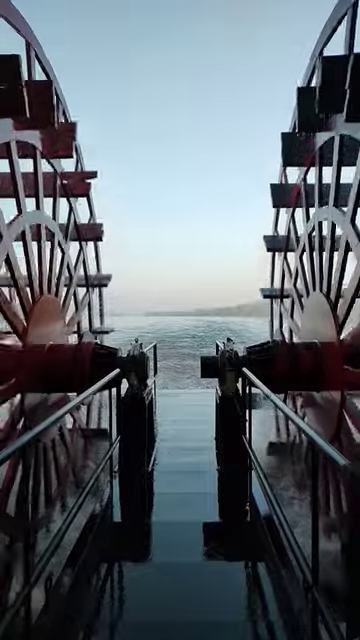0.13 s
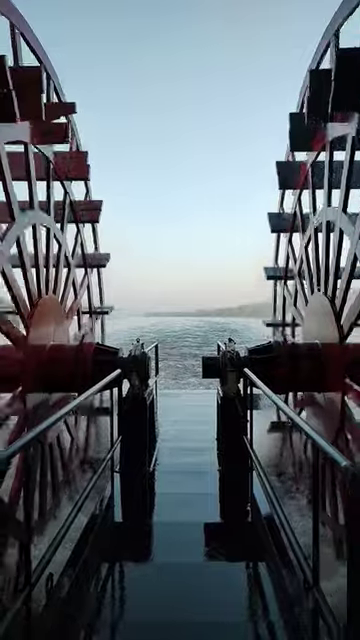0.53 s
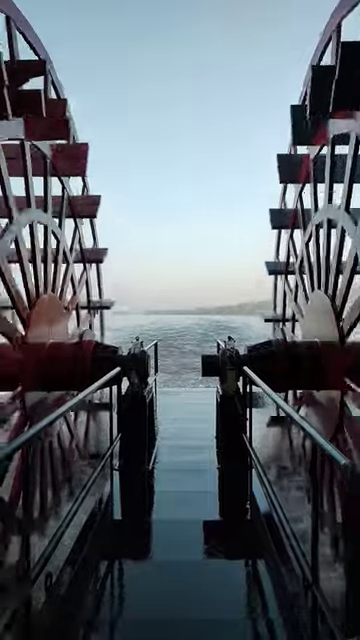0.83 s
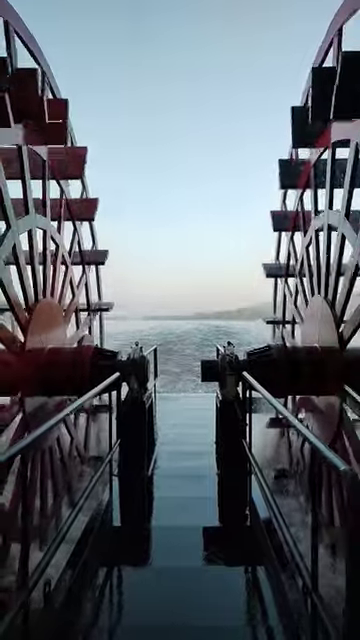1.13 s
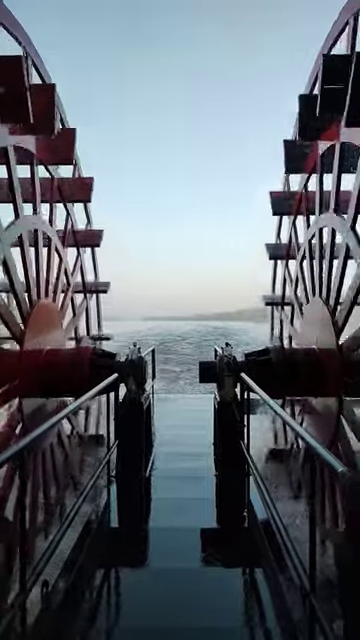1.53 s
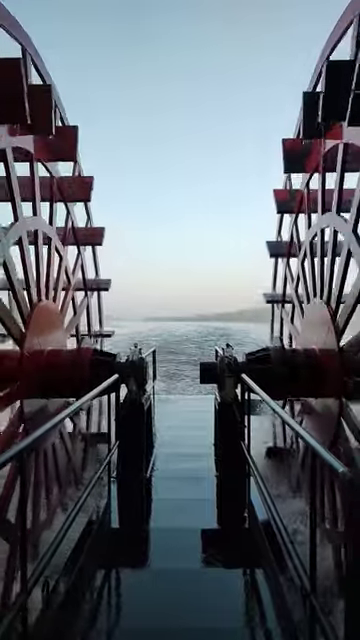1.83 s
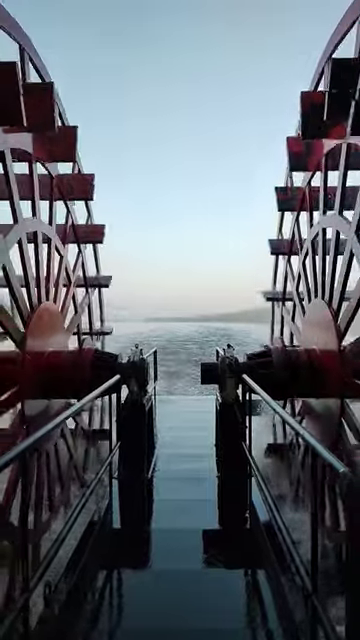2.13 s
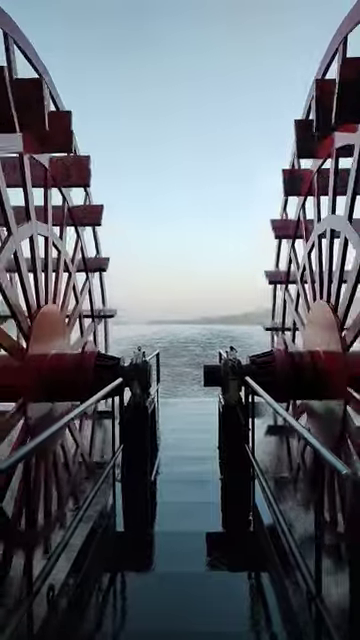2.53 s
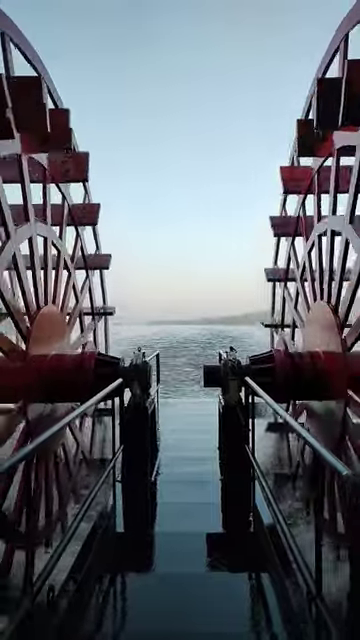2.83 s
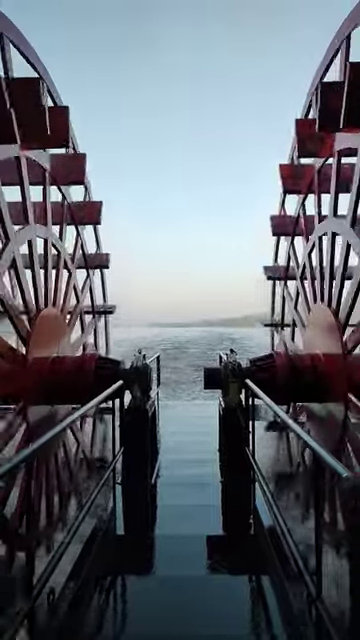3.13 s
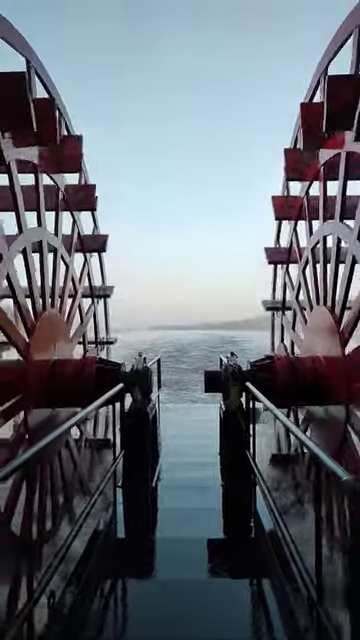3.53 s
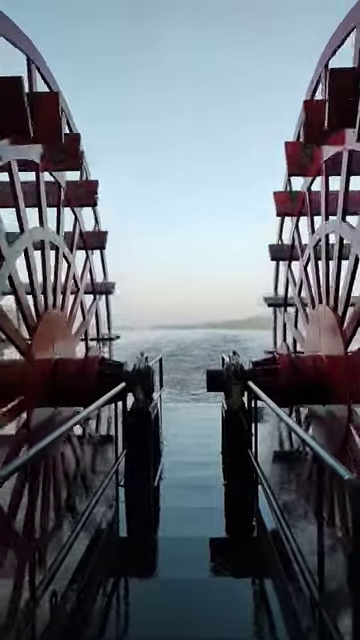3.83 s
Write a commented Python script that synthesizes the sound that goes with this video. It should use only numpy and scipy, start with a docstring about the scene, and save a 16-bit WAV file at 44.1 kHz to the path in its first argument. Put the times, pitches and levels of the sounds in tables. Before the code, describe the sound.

After a brief silence, a loud, sharp steam-like hiss cuts in on a paddle boat's stern deck, sputtering and surging over churned water and engine rumble; later its colour shifts and the wash comes forward. Close, mono.

```python
"""Paddle boat stern deck

Under way, in mono; the sound cuts in after a short silence. A loud, surging hiss, probably steam, is noise
in two bands. The wheels' wash is patchy noise with bubble rings; the engine room is low noise with growing
deep bass; hum and whine are sines of unsteady pitch.
Partway the listening position shifts: the hiss changes colour, and wash and drone come forward."""
import sys
import numpy as np
from scipy import signal
from scipy.fft import rfft, irfft, next_fast_len
from scipy.io import wavfile
from scipy.ndimage import uniform_filter1d, map_coordinates

SR = 44100
rng = np.random.default_rng(int(sys.argv[2]) if len(sys.argv) > 2 else 0)


def digitize_waveform(pressure):
    """Quantize a signal to 16-bit integers and store it at the path in sys.argv[1].

    Rows of a 2-D input are taken as channels; values are limited to [-1, 1].
    """
    field = np.atleast_2d(pressure).T
    bounded = np.clip(field, -1, 1)
    quanta = np.round(bounded * 32767).astype(np.int16)
    wavfile.write(sys.argv[1], SR, quanta)


N = 176400

# Bright hiss level before HISS_TRIM_DB: start_s, level_db
BRIGHT_HISS_LEVEL = [(.31, -11.5), (.35, -13), (.43, -16.5), (.47, -12.5), (.63, -13), (.72, -12.7),
                     (.88, -13), (.95, -16), (1.06, -13.5), (1.16, -13.5), (1.25, -11.5), (1.35, -16),
                     (1.39, -11.5), (1.52, -14.5), (1.63, -14), (1.71, -11.5), (1.78, -12), (1.87, -14.5),
                     (1.98, -11.5), (2.04, -12.5), (2.13, -13), (2.19, -15.5), (2.29, -13), (2.4, -14.5),
                     (2.5, -12), (2.58, -14.5), (2.68, -13.3), (2.91, -14), (3.15, -13), (3.21, -14),
                     (3.45, -14.6), (3.52, -12.5), (3.6, -13.8), (3.72, -12), (3.8, -15.5), (3.92, -12.5)]
# Lower hiss level: start_s, level_db
LOW_HISS_LEVEL = [(.32, -19.5), (.43, -23), (.48, -20), (.8, -19.5), (.95, -20.5), (1.06, -20),
                  (1.35, -20.5), (1.45, -19.3), (1.54, -22.5), (1.63, -19), (1.75, -19), (1.86, -22.5),
                  (1.93, -19.5), (2.12, -20), (2.19, -23), (2.29, -19), (2.35, -21.5), (2.78, -21.5),
                  (3.15, -21), (3.22, -23), (3.72, -20.5), (3.8, -23.5), (4, -21.5)]
# Hiss spectrum before the shift: frequency_hz, relative_db
HISS_SPECTRUM_BEFORE = [(1500, -25), (2400, -21.5), (2850, -18), (3150, -11), (3400, -8.5), (3800, -14.5),
                        (4400, -9), (5200, -10), (5650, -8.5), (6000, -8.5), (6850, -1), (7250, -1.5),
                        (7800, 1.5), (8250, -3), (9000, -10), (10000, -16.5), (11500, -25), (15300, -25.5)]
# Hiss spectrum after the shift: frequency_hz, relative_db
HISS_SPECTRUM_AFTER = [(1500, -43), (2400, -19.5), (2900, -16), (3400, -11.5), (3850, -16.5), (4500, -9.5),
                       (4850, -10.5), (5350, -12.5), (5700, -7.5), (6000, -11.5), (6400, -3.5),
                       (6900, -2.5), (7250, -3), (7800, 0), (8400, -3), (9000, -7.5), (10000, -14),
                       (11500, -22.5), (15300, -24)]
# Churned water spectrum: frequency_hz, relative_db
WASH_SPECTRUM = [(200, -26), (450, -3), (560, -4.5), (750, -1.5), (1050, -0.5), (1450, -1.5), (1800, 1.5),
                 (1950, 3), (2080, -4.5), (2300, -9), (3200, -20), (6000, -40)]
# Wash level before WASH_TRIM_DB: start_s, level_db
WASH_LEVELS = [(0.32, -25.5), (0.84, -25.5), (0.95, -28), (1.2, -24), (1.21, -26.5), (1.76, -25.5),
               (1.88, -28.5), (1.9, -24.5), (2.18, -27.5), (2.72, -23), (2.89, -26.5), (2.95, -23.5),
               (3.87, -23.5), (4.0, -21)]
# Engine room spectrum: frequency_hz, relative_db
RUMBLE_SPECTRUM = [(20, -38), (36, -26), (50, -11.5), (65, -5.5), (76, -4.5), (92, 2), (108, -1.5),
                   (135, 0), (175, -3), (197, 2), (218, -2.5), (330, -1.5), (405, -2), (470, -8.5),
                   (560, -18.5), (900, -32.5)]
# Rumble level before RUMBLE_TRIM_DB: start_s, level_db
RUMBLE_LEVELS = [(0.32, -22.5), (0.42, -27), (0.58, -23.5), (1.0, -25.5), (1.05, -23.5), (2.39, -24),
                 (2.51, -19), (2.54, -25), (2.9, -21.5), (4.0, -21)]
# Gain on the deepest part of the rumble: start_s, gain_db
DEEP_BASS_GAIN = [(.31, -20), (.5, -8), (.7, -3), (2.3, 1), (2.8, 2), (4, 3)]
# Steady machinery tones: pitch_hz, before_shift_db, after_shift_db, wander_hz
MACHINE_TONES = [(120, -33.5, -29.5, 1.6), (339, -37, -34, 3.5), (748, -43, -50, 3), (3366, -45, -50, 8),
                 (3972, -44, -50, 2), (4288, -40, -45, 2), (4372, -36.5, -38, 1.5), (4456, -44, -36.5, 2),
                 (6855, -31, -39, 14)]
# Swelling hum: start_s, level_db
HUM_LEVELS = [(.31, -45), (.55, -29.5), (.9, -42), (1.5, -38), (2, -34.5), (2.3, -29.5), (2.6, -28.5),
              (2.8, -40), (3.2, -30), (3.6, -30.5), (4, -41)]
# Whine, perhaps a pump: start_s, level_db
WHINE_LEVELS = [(.31, -38), (.5, -26), (.62, -42), (1.1, -39), (1.25, -44), (1.38, -27), (1.55, -45),
                (2.3, -39), (2.7, -31), (3, -29), (3.3, -35), (3.53, -27.5), (3.8, -33), (4, -35)]
# Whine partials: pitch_hz, relative_db, wander_hz
WHINE_PARTIALS = [(1936, 0, 6), (1890, -3.5, 7)]

START_S, FADE_IN_S = 0.3081, 0.002
SHIFT_MIDDLE_S, SHIFT_LENGTH_S = 2.58, 0.68
HISS_SPLIT_HZ, DEEP_BASS_HZ = 6120, 91
HISS_TRIM_DB, WASH_TRIM_DB, RUMBLE_TRIM_DB = -1, 1, -0.58
BUBBLES_PER_S, BUBBLE_MEDIAN_HZ, BUBBLE_DECAY_CYCLES, BUBBLE_DB = 350, 1000, 7.5, -10
TONE_WAVER_DB, WAVER_KNOTS_PER_S, WANDER_KNOTS_PER_S = 1.5, 7.07, 25
HUM_HZ, HUM_WANDER_HZ = 160.5, 1.24
CEILING, TOP_HZ = 0.97, 15550


def amp(db):
    """Decibels to gain."""
    return 10 ** (np.asarray(db) / 20)


def unit(x):
    """x at rms 1."""
    return x / np.sqrt(np.mean(x ** 2) + 1e-20)


def curve(rows):
    """(s, value) rows as one value per sample."""
    return np.interp(np.arange(N) / SR, *np.transpose(rows))


def wobble(knots_per_s):
    """Smooth random curve through normal-distributed knots."""
    knots = rng.standard_normal(2048)
    return map_coordinates(knots, [np.arange(N) * knots_per_s / SR], mode="mirror")


def wandering_sine(pitch_hz, wander_hz, knots_per_s):
    """Sine of unsteady pitch: the phase integrates the wandering frequency."""
    frequency_hz = pitch_hz + wander_hz * wobble(knots_per_s)
    return np.sin(2 * np.pi * np.cumsum(frequency_hz) / SR)


def filtered(x, response):
    """x times a zero-phase response of frequency."""
    padded = next_fast_len(N + SR // 2)
    spectrum = rfft(x, padded) * response(np.fft.rfftfreq(padded, 1 / SR))
    return irfft(spectrum, padded)[:N]


def coloured(x, spectrum):
    """x shaped by (Hz, dB) points on a log axis, at rms 1."""
    point_hz, point_db = np.transpose(spectrum)
    log_hz = np.log(point_hz + 1)
    return unit(filtered(x, lambda hz: amp(np.interp(np.log(hz + 1), log_hz, point_db))))


def rush(spectrum, patchy_db):
    """Coloured noise, rms 1, with random gain patches in time and frequency."""
    noise = signal.stft(rng.standard_normal(N), nperseg=512)[2]
    patches = uniform_filter1d(rng.standard_normal(noise.shape), size=7, axis=0)
    patches = uniform_filter1d(patches, size=10, axis=1)
    patchy = signal.istft(noise * amp(patchy_db * unit(patches)), nperseg=512)[1][:N]
    return coloured(patchy, spectrum)


def shift():
    """Listening position: 0 before the move, 1 after."""
    return np.clip((np.arange(N) / SR - SHIFT_MIDDLE_S) / SHIFT_LENGTH_S + 0.5, 0, 1)


def steam():
    """Jet noise that sputters finely; its lower and bright bands surge separately."""
    moved = shift()
    # equal-power crossfade
    jet = np.sqrt(1 - moved) * rush(HISS_SPECTRUM_BEFORE, patchy_db=0.76)
    jet += np.sqrt(moved) * rush(HISS_SPECTRUM_AFTER, patchy_db=0.7)
    low = filtered(jet, lambda hz: 1 / (1 + (hz / HISS_SPLIT_HZ) ** 12))
    bright = jet - low
    sputter = unit(amp(0.32 * wobble(25.12) + 0.4 * wobble(260)))
    bright_surge = amp(HISS_TRIM_DB + curve(BRIGHT_HISS_LEVEL)) * unit(bright)
    low_surge = amp(curve(LOW_HISS_LEVEL)) * unit(low)
    return sputter * (bright_surge + low_surge)


def wash():
    """The paddles churn the river: a rush with bubbles in it."""
    water = rush(WASH_SPECTRUM, patchy_db=0.8)
    water += amp(BUBBLE_DB) * coloured(bubbles(), WASH_SPECTRUM)
    return amp(WASH_TRIM_DB + curve(WASH_LEVELS) + 0.52 * wobble(14)) * water


def bubbles(count=2000):
    """Air beaten into the water: short decaying rings of rising pitch, at random times."""
    t = np.arange(SR // 30) / SR
    start_s = np.cumsum(rng.exponential(size=count)) / BUBBLES_PER_S
    pitch_hz = BUBBLE_MEDIAN_HZ * np.exp(0.449 * rng.standard_normal((count, 1)))
    size = amp(2.8 * np.minimum(rng.exponential(size=(count, 1)), 4))
    age = pitch_hz * t / BUBBLE_DECAY_CYCLES
    phase = 2 * np.pi * pitch_hz * t * (1 + 0.04 * np.minimum(age, 2))
    envelope = np.exp(-2 * age) * (1 - np.exp(-20 * age))
    rings = size * np.sin(phase) * envelope
    at = (start_s[:, None] * SR).astype(int) + np.arange(len(t))
    return np.bincount(at.ravel(), rings.ravel(), N)[:N]


def rumble():
    """Engine room roar through the deck: low noise whose deepest part grows."""
    roar = rush(RUMBLE_SPECTRUM, patchy_db=0.84)
    deep = filtered(roar, lambda hz: 1 / (1 + (hz / DEEP_BASS_HZ) ** 6))
    balanced = roar - deep + amp(curve(DEEP_BASS_GAIN)) * deep
    return amp(RUMBLE_TRIM_DB + curve(RUMBLE_LEVELS)) * balanced


def tones():
    """Motors and pumps: sines, each a little unsteady in pitch and level."""
    out, moved = np.zeros(N), shift()
    for pitch_hz, before_db, after_db, wander_hz in MACHINE_TONES:
        sine = wandering_sine(pitch_hz, wander_hz, WANDER_KNOTS_PER_S)
        wavering = unit(amp(TONE_WAVER_DB * wobble(WAVER_KNOTS_PER_S)) * sine)
        out += amp(before_db + (after_db - before_db) * moved) * wavering
    return out


def hum():
    """One machine hum, a wandering sine that swells and fades."""
    return amp(curve(HUM_LEVELS)) * unit(wandering_sine(HUM_HZ, HUM_WANDER_HZ, 15))


def whine():
    """Mid-pitched machine whine, perhaps a pump: wandering partials that come and go together."""
    partials = np.zeros(N)
    for pitch_hz, relative_db, wander_hz in WHINE_PARTIALS:
        partials += amp(relative_db) * wandering_sine(pitch_hz, wander_hz, WANDER_KNOTS_PER_S)
    return amp(curve(WHINE_LEVELS)) * unit(partials * amp(1.5 * wobble(11)))


def scene():
    """All sources, the same in both channels."""
    deck = steam() + wash() + rumble() + tones() + hum() + whine()
    return np.array([deck, deck])


def record(dry):
    """Abrupt start, highest peaks rounded off, then a steep low-pass at TOP_HZ."""
    on = np.clip((np.arange(N) / SR - START_S) / FADE_IN_S, 0, 1)
    rounded = on * dry / (1 + np.abs(dry / CEILING) ** 10) ** (1 / 10)
    # straight 200 Hz wide edge
    return np.array([filtered(channel, lambda hz: np.clip((TOP_HZ - hz) / 200 + 0.5, 0, 1))
                     for channel in rounded])


dry = scene()
out = record(dry)
digitize_waveform(out)
```